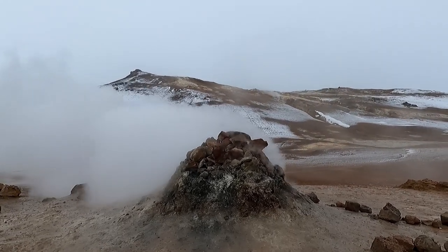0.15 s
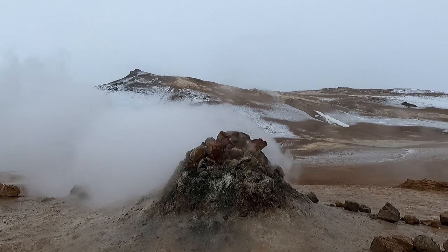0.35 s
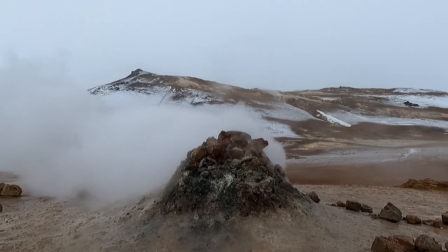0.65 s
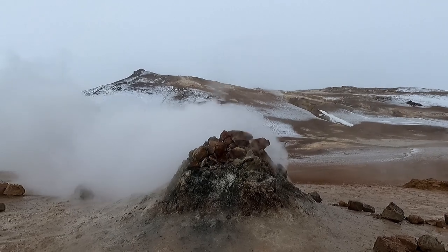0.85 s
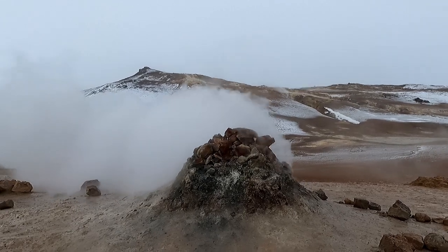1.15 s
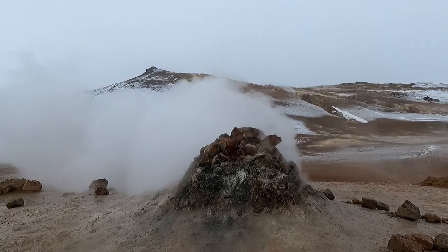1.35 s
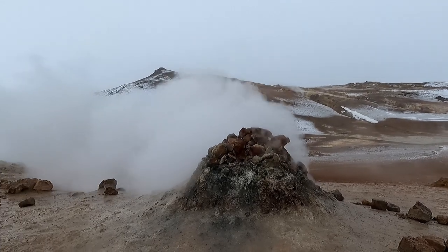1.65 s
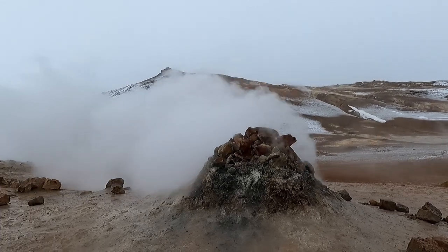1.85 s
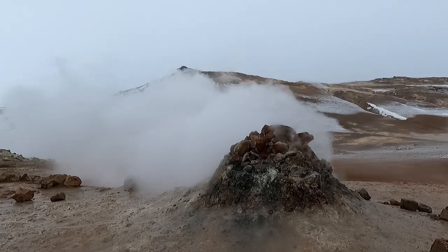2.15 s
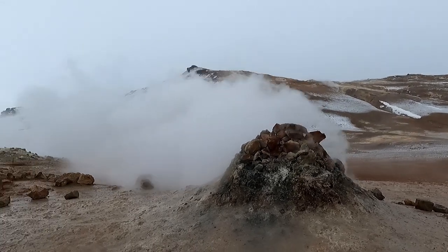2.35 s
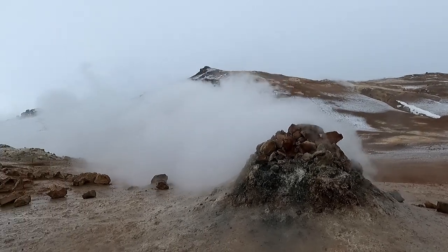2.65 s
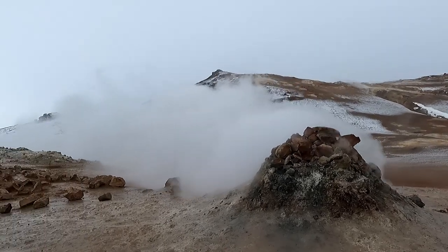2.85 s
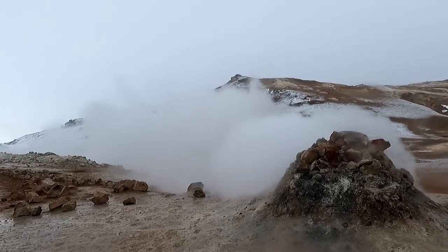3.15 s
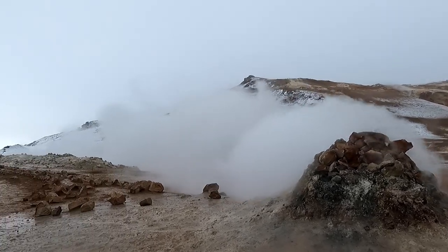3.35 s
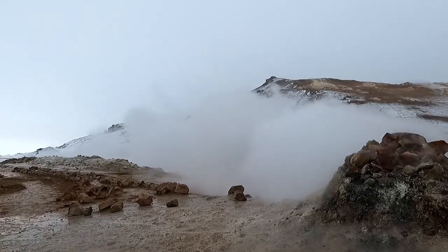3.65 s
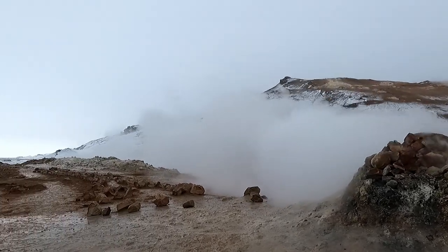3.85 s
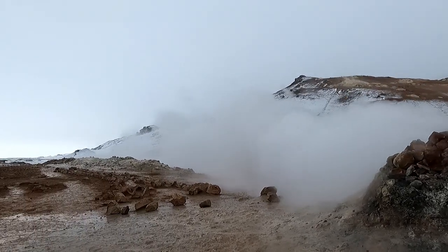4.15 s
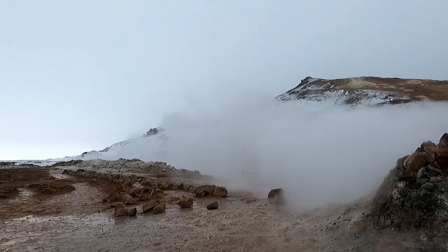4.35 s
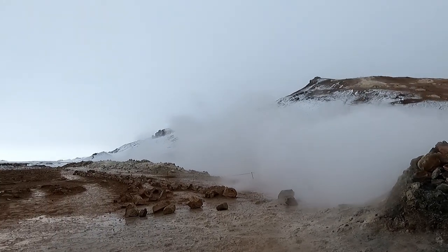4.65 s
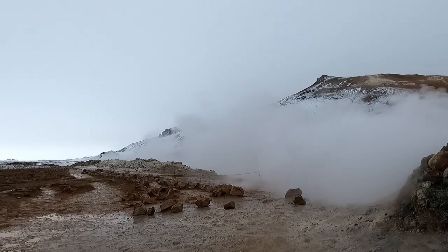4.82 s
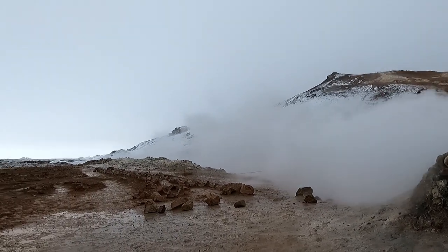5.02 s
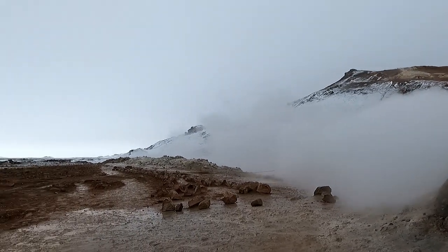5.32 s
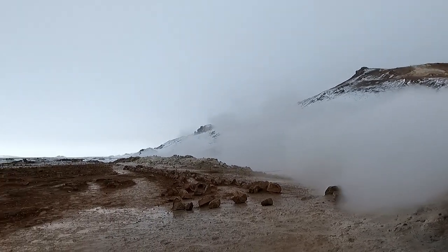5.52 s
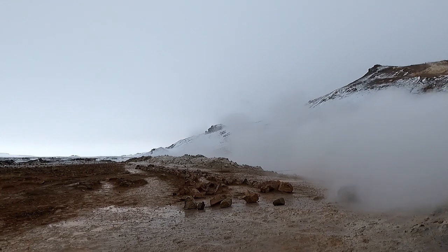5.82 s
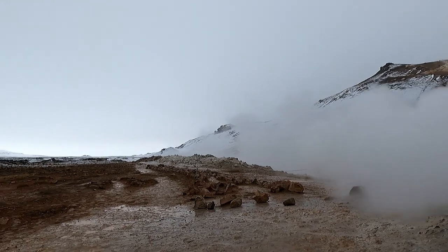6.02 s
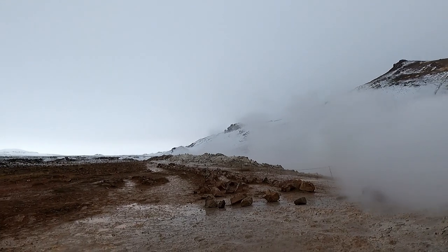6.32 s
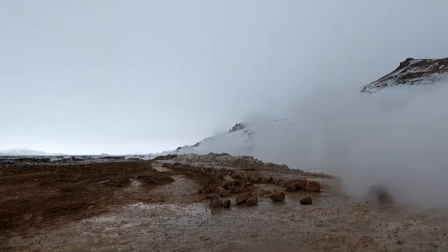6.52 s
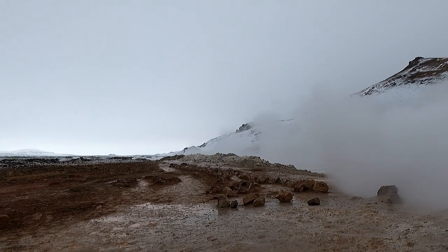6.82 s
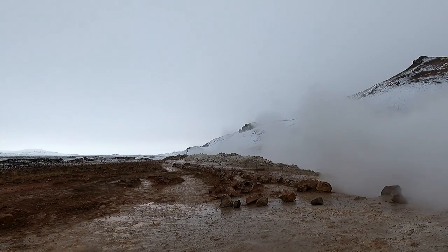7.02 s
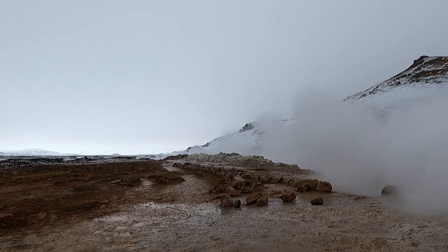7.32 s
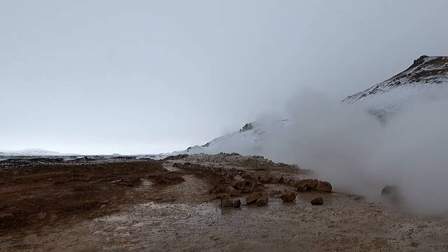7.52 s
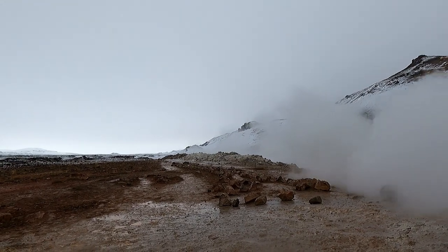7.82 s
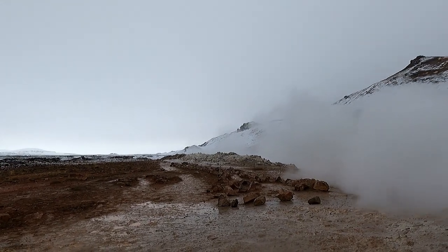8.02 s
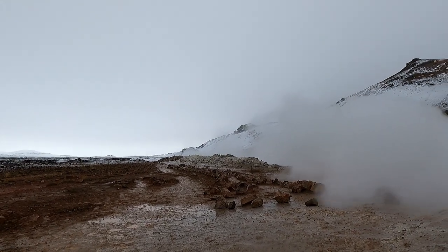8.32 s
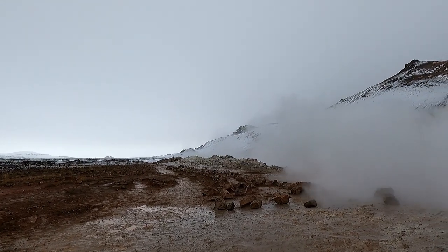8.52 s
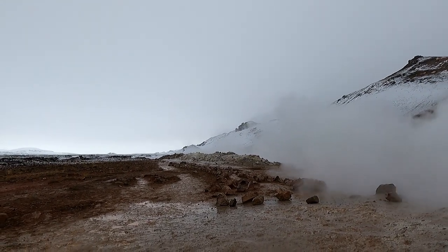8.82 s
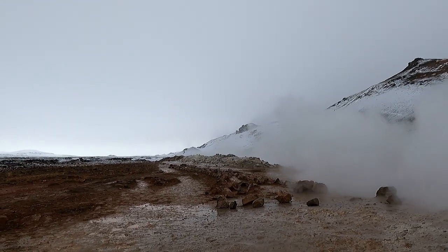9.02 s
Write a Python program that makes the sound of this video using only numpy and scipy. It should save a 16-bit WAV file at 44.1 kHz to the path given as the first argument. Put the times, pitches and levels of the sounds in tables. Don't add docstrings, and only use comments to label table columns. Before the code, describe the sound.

Constant rushing steam from a rocky vent, peppered with droplet pops, under strong wind that rumbles and buffets the handheld microphone in rough bursts.

```python
import sys
import numpy as np
from scipy import signal
from scipy.fft import rfft, irfft, next_fast_len
from scipy.io import wavfile
from scipy.ndimage import uniform_filter1d, map_coordinates

SR = 44100
rng = np.random.default_rng(int(sys.argv[2]) if len(sys.argv) > 2 else 0)


def linear_from_db(decibels):
    return 10 ** (np.asarray(decibels, float) / 20)


def unload_wav(signal):
    wavfile.write(
        sys.argv[1],
        SR,
        np.round(np.clip(np.atleast_2d(signal).T, -1, 1) * 32767).astype(np.int16),
    )


N = 404397

# time_s, flow_db, open_throat_db
VENT_FLOW = [(0, -41.5, -1), (.4, -41, 2.5), (.7, -39.5, 4), (1.5, -39.5, 5.5), (2.2, -42.5, 7),
             (2.9, -45, 7.5), (3.35, -45, 7), (3.5, -43.5, 1.5), (4.3, -43.5, 7.5), (4.7, -45.5, 8),
             (5.45, -48.5, 10.5), (5.6, -45, 10), (6.1, -44.5, 3.5), (6.55, -46, 4), (7.1, -44, 9),
             (7.45, -47, 11), (8.35, -43.5, 6), (8.7, -43.5, 8.5)]
# time_s, strength_db
WIND_STRENGTH = [(0.0, -10), (0.02, -18.5), (1.68, -25.5), (1.71, -24), (2.32, -30), (3.27, -27.5),
                 (3.42, -19), (4.85, -29.5), (5.23, -25), (5.36, -32.5), (5.62, -21), (5.72, -22.5),
                 (5.8, -20.5), (6.46, -17.5), (6.59, -24), (7.12, -30.5), (7.74, -16.5), (9.17, -29.5)]
# time_s, chest_delay_ms, chest_share, hand_delay_ms, hand_share
BODY_ECHO = [(0, 1.06, 0.34, 0.26, 0.18), (.5, 1.03, 0.36, 0.25, 0.091), (2.2, 1.065, 0.29, 0.24, 0.075),
             (3, 1, 0.31, 0.23, 0.1), (3.8, 0.89, 0.29, 0.13, 0.037), (4.7, 0.75, 0.088, 0.73, .03),
             (5.5, 0.86, 0.048, 0.58, 0.058), (6.3, 1.1, 0.067, 0.65, 0.11), (7, 1.5, 0.033, 0.57, 0.17),
             (8, 1.8, 0.037, 0.54, 0.1), (8.3, 0.96, 0.041, 0.34, 0.053), (8.7, 1.34, 0.092, 0.13, 0.12),
             (9.17, 0.87, 0.13, 0.18, 0.22)]


def unit(x):
    return x / np.sqrt(np.mean(x ** 2) + 1e-20)


def about_mean(x):
    return x - x.mean()


def along(points, hz):
    f, v = np.transpose(points)
    return np.interp(np.log(hz + 1), np.log(f + 1), v, left=-120, right=-120)


def curves(rows):
    s, *cols = np.transpose(rows)
    return [np.interp(np.arange(N) / SR, s, c) for c in cols]


def wobble(rate):
    knots = rng.standard_normal(2048)
    return map_coordinates(knots, [np.arange(N) * rate / SR], mode="wrap")


def filtered(x, response):
    m = next_fast_len(N + SR // 2)
    return irfft(rfft(x, m) * response(np.fft.rfftfreq(m, 1 / SR)), m)[:N]


def below(hz, edge_hz):
    return 1 / (1 + (hz / edge_hz) ** 6)


def rush(spectrum, patchy_db):
    z = signal.stft(rng.standard_normal(N), nperseg=512)[2]
    field = uniform_filter1d(rng.standard_normal(z.shape), size=10, axis=1)
    field = uniform_filter1d(field, size=6, axis=0)
    noise = signal.istft(z * linear_from_db(patchy_db * unit(field)), nperseg=512)[1][:N]
    return unit(filtered(noise, lambda hz: linear_from_db(along(spectrum, hz))))


def jet():
    # hz, db_per_hz
    jet_spectrum = [(190, -17), (330, -5), (410, -5.5), (560, -0.5), (1330, -10.5), (1660, -18),
                    (1950, -18), (3000, -26), (4220, -30), (6900, -35.5), (8430, -50), (10500, -64.5),
                    (12600, -71), (16500, -72.5)]
    flow_db, throat_db = curves(VENT_FLOW)
    swell_db, blow_db = about_mean(flow_db), about_mean(curves(WIND_STRENGTH)[0])
    shade_db = 1.5 * about_mean(curves(BODY_ECHO)[1])
    sputter_db = 0.5 * wobble(30) + 0.65 * wobble(210)

    steam = rush(jet_spectrum, patchy_db=0.75)
    low = [filtered(steam, lambda hz: below(hz, edge)) for edge in (1550, 4800, 9200)]
    roar, hiss = unit(low[0]), unit(low[1] - low[0])
    fizz, air = unit(low[2] - low[1]), unit(steam - low[2])
    lift_db = mist_db()
    fizz = fizz + (linear_from_db(lift_db) - 1) * filtered(fizz, lambda hz: 1 - below(hz, edge_hz=7900))

    roar_db = flow_db + throat_db + 2.0 + 0.17 * wobble(8.5)
    hiss_db = flow_db - 0.35 + 0.87 * sputter_db
    fizz_db = -61.5 + 0.91 * swell_db - shade_db + 0.65 * wobble(4.6)
    fizz_db += 0.6 * sputter_db + wobble(60)
    air_db = -70 + 0.55 * swell_db + 0.8 * lift_db - shade_db - 0.35 * blow_db
    air_db += 1.2 * wobble(11) + sputter_db + 1.1 * wobble(40)
    return linear_from_db(roar_db) * roar + linear_from_db(hiss_db) * hiss + linear_from_db(fizz_db) * fizz + linear_from_db(air_db) * air


def mist_db():
    # time_s, half_length_s, lift_db
    sprays = [
        (1.1, 0.076, 2),
        (4.25, 0.13, 1),
        (5.404, 0.13, 1),
        (6.65, 0.055, 2),
        (7.752, 0.34, 5),
        (9.08, 0.062, 0),
    ]
    t = np.arange(N) / SR
    return sum(db * np.exp(-((t - s) / half) ** 2) for s, half, db in sprays)


def spits():
    # time_s, pop_peak_db, pop_hz, crack_db
    droplets = [(.0605, -22, 1950, -67), (.0765, -33, 2200, -69), (.1305, -24, 2000, -67),
                (.1767, -23, 3000, -74), (.235, -34, 2000, -75), (.4903, -27, 3000, -78),
                (.7207, -27, 5200, -74), (1.0056, -31, 1900, -71), (1.0374, -31, 3600, -70),
                (1.069, -28, 4600, -68), (1.1088, -38, 6500, -58), (1.134, -20, 1500, -66),
                (1.5404, -32, 1900, -70), (1.8998, -22, 1900, -62), (1.9726, -23, 900, -74),
                (3.4042, -39, 1800, -65), (3.8716, -33, 2400, -75), (5.0574, -27, 850, -72),
                (5.39, -40, 1500, -67), (5.694, -37, 4000, -72), (6.6414, -35, 5200, -65),
                (7.6604, -36, 6000, -56), (7.919, -38, 6000, -56), (7.987, -35, 1500, -75),
                (7.999, -33, 1950, -76), (8.639, -33, 4200, -69), (8.807, -34, 4000, -72)]
    pops, cracks, t = np.zeros(N + SR), np.zeros(N + SR), np.arange(SR // 30) / SR
    draws = rng.standard_normal((len(droplets), 2, len(t)))
    for (s, pop_db, pop_hz, crack_db), (a, b) in zip(droplets, draws):
        start = round((s + 0.00058) * SR)
        pop = np.sin(2 * np.pi * pop_hz * t) * linear_from_db(-14 * pop_hz * t)
        pop += 0.22 * a * linear_from_db(-60 * t / 0.01)
        crack = linear_from_db(-60 * t / 0.0068) * np.sign(b)
        spray = 0.18 * b * linear_from_db(-60 * t / 0.04)
        pops[start:][:len(t)] -= linear_from_db(pop_db + 8) * pop
        cracks[start:][:len(t)] += linear_from_db(crack_db + 10) * (crack + spray)
    pop_band = signal.butter(4, [400, 7000], "bandpass", fs=SR, output="sos")
    crack_band = signal.butter(2, [7200, 11200], "bandpass", fs=SR, output="sos")
    dull = signal.sosfilt(pop_band, pops)[:N]
    bright = signal.sosfilt(crack_band, cracks)[:N]
    return filtered(dull, lambda hz: below(hz, edge_hz=7500)) + bright


def body_echo(x):
    chest_ms, chest, hand_ms, hand = curves(BODY_ECHO)

    def late(v, ms):
        return map_coordinates(v, [np.arange(N) - ms * SR / 1000], mode="mirror")

    dull = filtered(x, lambda hz: 0.15 + 0.72 * below(hz, edge_hz=3900))
    total = x + chest * late(dull, chest_ms) + hand * late(x, hand_ms)
    return total / np.sqrt(1 + chest ** 2 + hand ** 2)


def gliding_bands(x):
    # time_s, half_length_s, centre_hz, glide_hz_per_s, lift_db
    band_lifts = [(0.81, .9, 3900, 1, 2), (2.7, .6, 3900, 1, 2.5), (.4, .6, 2900, -2, -2.5),
                  (1.5, .4, 2600, -1, -2), (.5, .6, 5100, 300, -1.5), (0.51, .25, 910, 0, 3.5),
                  (.15, 0.3, 480, 0, -7.5), (2, .5, 7200, 1, 2), (3.45, .25, 2650, 0, -6),
                  (3.5, .25, 5000, 0, 2), (3.5, .2, 4100, -2, 2.5), (4.3, .35, 1350, 3, 2),
                  (4.5, 0.23, 3150, 0, 3.5), (6.3, .4, 4700, 500, -5), (7.4, 0.44, 1250, -500, -3),
                  (7.1, .2, 5500, 0, -4), (8.6, .5, 5300, 1201, 4), (7.8, .3, 8100, 0, 5),
                  (9, .25, 6500, -1, -7), (8.6, .35, 1430, 0, 2), (8.5, .3, 2400, 1001, -3.5),
                  (2.35, 0.11, 680, 0, -3), (9, .2, 3200, 0, 1.5), (8.3, .18, 3900, 5000, -3),
                  (7.2, .08, 3400, 6000, -6), (7.85, .3, 4900, 0, 2), (4.5, 0.17, 3050, 0, -3),
                  (2, .2, 3500, 0, -2), (1.3, .8, 800, -1, 1), (7, .1, 990, 0, 3.5), (.8, .7, 2300, 0, 1.5),
                  (8.5, .25, 8600, -800, 5), (7.7, .4, 8000, 300, 3), (7.7, .2, 3150, -1, 3),
                  (9, .2, 2950, 0, 2), (6.4, .2, 3700, 0, -3), (5.5, .4, 4400, 400, -5),
                  (3.4, .7, 6800, 0, -2.5), (1.6, .4, 8300, 0, -3), (1, 1.2, 1580, -1, -1)]
    width_hz = 200
    hz, t, z = signal.stft(x, SR, nperseg=512)
    lift_db = np.zeros((len(hz), len(t)))
    for s, half, centre_hz, glide, db in band_lifts:
        off_hz = hz[:, None] - centre_hz - glide * (t - s)
        lift_db += db * np.exp(-((t - s) / half) ** 2 - (off_hz / width_hz) ** 2)
    return signal.istft(z * linear_from_db(lift_db), SR, nperseg=512)[1][:N]


def wind():
    # hz, db_per_hz
    buffet_spectrum = [(8, -18.5), (20, 1), (50, -1), (100, -3), (150, -11.5), (250, -37)]
    flutter_spectrum = [(60, -23.5), (110, -4.5), (160, -1), (240, -1.5), (298, -7.5), (350, -24.5),
                        (500, -40.5)]
    tear_spectrum = [(150, -26), (300, 3), (400, -1.5), (540, -3.5), (900, -13), (1500, -27.5), (3000, -40),
                     (6000, -52.5)]
    rip_spectrum = [(400, -3.5), (800, 2), (1400, -4), (1750, -13.5), (2500, -20.5), (5000, -30.5),
                    (8000, -38)]
    strength_db, = curves(WIND_STRENGTH)
    plume_db, blow_db = about_mean(sum(curves(VENT_FLOW))), about_mean(strength_db)
    whole, shove, tearing, ripping = gusts()
    swell_db, flap_db = lumps_db()
    eddy = wobble(22)

    buffet = unit(linear_from_db(0.21 * wobble(29)) * evened(rush(buffet_spectrum, patchy_db=0.6)))
    flutter = evened(rush(flutter_spectrum, patchy_db=2.0))
    flutter = unit(linear_from_db(0.77 * eddy + 0.16 * wobble(65)) * flutter)
    tear = unit(linear_from_db(eddy + 1.5 * wobble(90)) * evened(rush(tear_spectrum, patchy_db=1.5)))
    rip = unit(linear_from_db(0.8 * wobble(90)) * evened(rush(rip_spectrum, patchy_db=1.4)))

    buffet_db = strength_db + swell_db - 0.6 + 1.5 * wobble(6.6)
    flutter_db = -28.5 + flap_db + 0.025 * blow_db + 0.74 * plume_db + 0.37 * wobble(19)
    tear_db = -39.5 + 0.55 * flap_db + 0.41 * blow_db + 0.12 * plume_db + 1.5 * wobble(12)
    return (np.hypot(linear_from_db(buffet_db), shove) * buffet
            + np.hypot(linear_from_db(flutter_db), whole) * flutter
            + np.hypot(linear_from_db(tear_db), tearing) * tear
            + ripping * rip)


def gusts():
    # peak_s, length_s, strength_db, shove_under_it_db, sharpness_db
    gust_table = [(0.073, 0.055, -30, -1, 0), (0.218, 0.084, -35, 8, 4), (4.963, 0.39, -30, -5, -7),
                  (0.577, .12, -29.5, 1, 3.5), (0.812, 0.078, -25.5, 3.5, 3), (1.768, 0.11, -24.5, 3.5, 2),
                  (2.099, 0.057, -32.5, 9, -9), (2.978, 0.093, -23, -6, -13), (3.14, 0.12, -28.5, 1, -6),
                  (3.403, 0.037, -17.5, -11, -1.5), (3.448, 0.14, -28.5, -7, 9),
                  (3.548, 0.094, -20, 0.5, 2), (3.688, 0.12, -23.5, -2, 0.5), (3.998, 0.038, -29, 11.5, 6),
                  (5.926, 0.062, -24.5, -2, -11), (5.592, 0.082, -21.5, 4.5, 4.5),
                  (5.569, 0.046, -35, -5, 10.5), (5.8, 0.11, -27.5, 7, 5), (6.035, 0.15, -30.5, -1, 7.5),
                  (6.401, 0.062, -31, 12, 6), (6.487, 0.02, -26.5, 5, 2.5), (7.751, 0.15, -29.5, 10.5, 5.5),
                  (7.874, 0.039, -26, 8, 4.5), (7.989, 0.04, -28, 6, 2.5), (8.385, 0.035, -35, 19, -8),
                  (0.883, .06, -27, 5, 1), (5, .03, -33, 8, -3), (5.21, .05, -32, 4, 5),
                  (5.702, .04, -32.5, -5, 8), (5.856, .05, -36, 1, 9), (6.335, .06, -34.5, 6, 7.5),
                  (7.575, .04, -36, 14, -5), (8.076, .04, -34, 6, 3), (3.6, .1, -33, -4, 5)]
    s, length, db, shove_db, sharp_db = np.transpose(gust_table)
    t = (np.arange(0, N, 64) / SR - s[:, None]) / length[:, None]
    rise_share = 0.39
    shape = np.exp(-(t / np.where(t < 0, rise_share, 1 - rise_share)) ** 2)
    tear_db = db - 8.5 + sharp_db
    rip_db = db - 21.5 + 2.12 * sharp_db
    gains = [np.sqrt(linear_from_db(v) ** 2 @ shape ** 2) for v in (db, db + shove_db, tear_db, rip_db)]
    return [np.interp(np.arange(N) / 64, np.arange(t.shape[1]), g) for g in gains]


def lumps_db():
    # time_s, half_length_s, buffet_lift_db, flutter_lift_db
    lumps = [(0.178, 0.07, 1, 5.5), (.43, .06, 1, -1), (.69, .04, 1.5, -3), (0.964, 0.037, 2.5, -3),
             (1.105, 0.067, 2, -5), (1.21, .06, 1.5, 2), (1.47, .05, 2, 0), (1.556, 0.035, -2, -4),
             (1.9, 0.055, 3, -2.5), (2.2, .07, -0.5, 1), (2.426, 0.076, -4, 2.5), (2.62, 0.097, 0.5, 1),
             (2.75, 0.13, 0, 3), (3.225, 0.044, 0, -3), (3.36, 0.046, -1.5, -5), (3.596, .025, -10, -8),
             (3.824, 0.045, -3.5, 4), (3.904, 0.049, 2.5, -4.5), (4.163, 0.029, -5.5, 2.5),
             (4.25, 0.081, 4.5, 1.5), (4.42, .05, -2, -0.5), (4.525, 0.044, -6, 3),
             (4.636, 0.045, 0.5, 5.5), (4.704, 0.049, -10, 1), (4.88, .06, -1, -2.5),
             (5.09, 0.071, -3.5, 3.5), (5.45, .05, -1.5, -4), (5.655, .035, 2.5, -4), (5.7, .02, -7, 0),
             (6.15, .05, 2, 4), (6.235, 0.037, -2, -2.5), (6.31, 0.045, -1.5, 1), (6.55, 0.034, -7, -4),
             (6.755, .07, -1, -3.5), (6.95, .07, -3, -0.5), (7.25, 0.075, -1, 0.5), (7.424, .06, 2.5, -1.5),
             (7.575, 0.062, -1, 4.5), (7.685, 0.035, -7, 0.5), (7.82, 0.032, -8, -8),
             (8.083, .05, -0.5, 0.5), (8.176, 0.056, -0.5, -1), (8.32, 0.035, -2, 2), (8.45, 0.04, -1, -5),
             (8.656, 0.073, 0.5, -5), (8.8, 0.065, -3, 0.5), (8.952, 0.047, -6, 2.5), (9.04, .04, 3, 1),
             (9.14, .04, 4, 1)]
    s, half, *lifts = np.transpose(lumps)
    step = np.arange(0, N, 64)
    shape = np.exp(-((step / SR - s[:, None]) / half[:, None]) ** 2)
    return [np.interp(np.arange(N), step, v @ shape) for v in lifts]


def evened(x):
    power = np.abs(uniform_filter1d(x ** 2, size=round(0.062 * SR)))
    return unit(x * (power + 0.05) ** (-0.76 / 2))


def slaps(table, cycles, gain_db):
    out, t = np.zeros(N + SR), np.arange(SR // 20) / SR
    for (s, db, hz), phase in zip(table, rng.random(len(table))):
        age = t * hz / cycles
        swing = age * np.exp(1 - age) * np.sin(2 * np.pi * (hz * t + phase))
        out[round(s * SR):][:len(t)] += linear_from_db(db + gain_db) * swing
    return out[:N]


def eddies():
    # time_s, peak_db, swing_hz
    slap_table = [(0.79, -9, 299), (1.777, -4.5, 163), (3.385, -26, 210), (3.449, -14, 221),
                  (3.515, -11, 253), (3.534, -7, 189), (3.555, -8, 197), (3.575, -7, 226), (3.42, -9, 150),
                  (8.383, -10.5, 112), (3.68, -4.5, 290), (5.467, -10, 184), (5.563, -27, 170),
                  (5.584, -8, 213), (5.604, -8.5, 228), (5.8, -18, 171), (6.398, -19, 198),
                  (6.608, -18, 186), (7.766, -4.5, 305), (7.871, -8.5, 208), (7.95, -14, 151),
                  (7.987, -19, 213)]
    further_slap_table = [(0.573, -13, 186), (1.47, -10, 227), (1.587, -10.5, 220), (1.924, -10.5, 161),
                          (2.351, -19, 153), (2.612, -19, 168), (2.964, -16, 145), (3.297, -17.5, 233),
                          (3.531, -12, 170), (3.959, -15, 159), (4.053, -11.5, 151), (4.423, -11.5, 150),
                          (4.945, -12, 163), (5.26, -16, 235), (6.257, -19, 144), (6.293, -7.5, 139),
                          (6.747, -18, 191), (7.23, -14.5, 175), (8.231, -20, 136), (9.072, -12, 223)]
    snap_table = [(0.792, -13, 549), (1.971, -17, 677), (3.359, -30, 633), (3.38, -14, 401),
                  (3.398, -27, 1080), (3.398, -18, 616), (3.418, -26, 439), (3.447, -29, 403),
                  (3.459, -19, 546), (3.469, -23, 514), (3.518, -24, 506), (3.539, -26, 484),
                  (3.547, -16, 450), (3.56, -17, 557), (3.58, -19, 423), (3.624, -22, 630),
                  (3.674, -22, 573), (3.689, -28, 401), (3.74, -20, 444), (5.056, -20, 705),
                  (5.159, -20, 630), (5.518, -17.5, 401), (5.561, -24, 603), (5.571, -24, 447),
                  (5.584, -26, 608), (5.601, -12, 479), (5.619, -18, 401), (5.629, -22, 463),
                  (5.797, -16, 405), (5.915, -25, 479), (6.029, -20, 401), (6.137, -20, 406),
                  (6.398, -18, 600), (6.441, -26, 791), (7.76, -22, 401), (7.861, -23, 552),
                  (7.949, -20, 560), (7.987, -15, 520), (7.999, -30, 589)]
    whip_table = [(3.397, -25, 1110), (3.416, -22, 966), (3.514, -24, 1320), (3.547, -26, 826),
                  (3.57, -28, 802), (3.61, -27, 907), (5.557, -28, 1130), (5.576, -30, 939),
                  (5.615, -18, 1160)]
    return (slaps(slap_table, cycles=0.72, gain_db=-9) + slaps(further_slap_table, cycles=0.79, gain_db=-6)
            + slaps(snap_table, cycles=0.51, gain_db=-3) + slaps(whip_table, cycles=0.9, gain_db=-5))


def scene():
    vent = gliding_bands(body_echo(jet() + spits()))
    return (vent + wind() + eddies())[None]


def low_pass(x):
    return signal.sosfilt(signal.butter(12, 15900, fs=SR, output="sos"), x)


def record(dry):
    held = dry / (1 + np.abs(dry / 0.5) ** 4) ** (1 / 4)
    return low_pass(held + 0.0016)


dry = scene()
out = record(dry)
unload_wav(out)
```